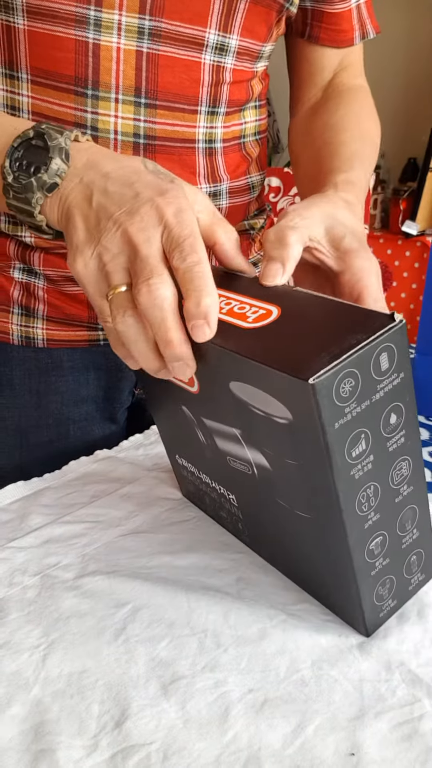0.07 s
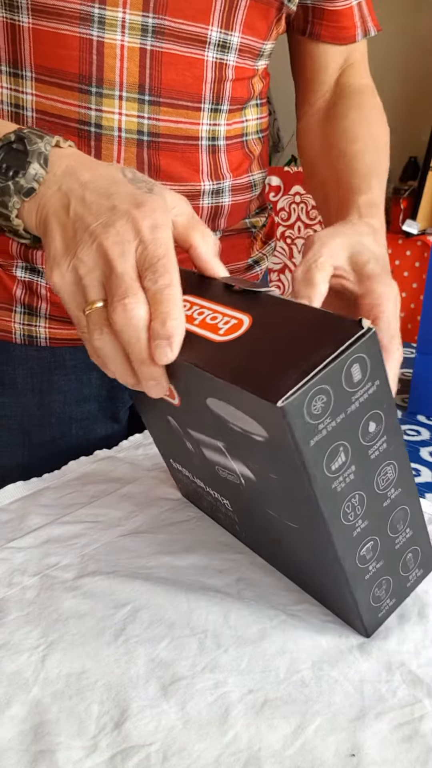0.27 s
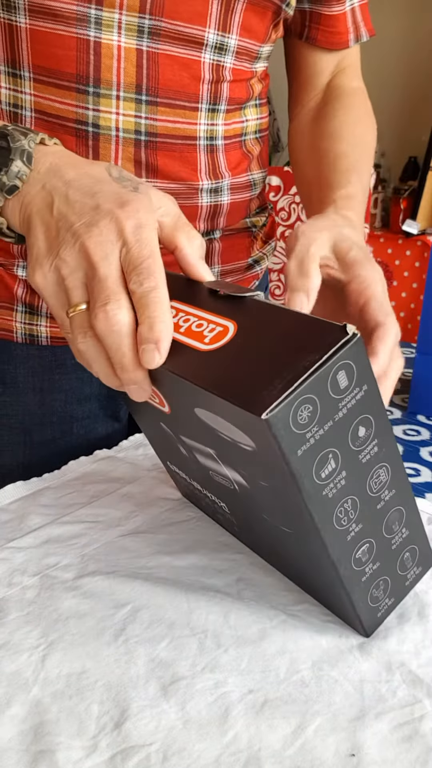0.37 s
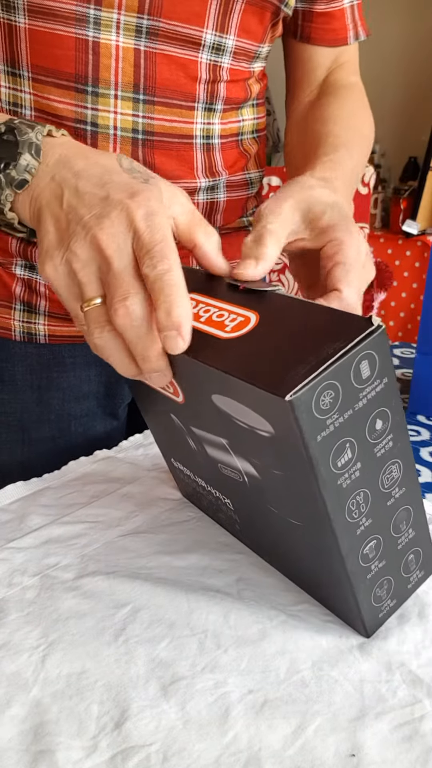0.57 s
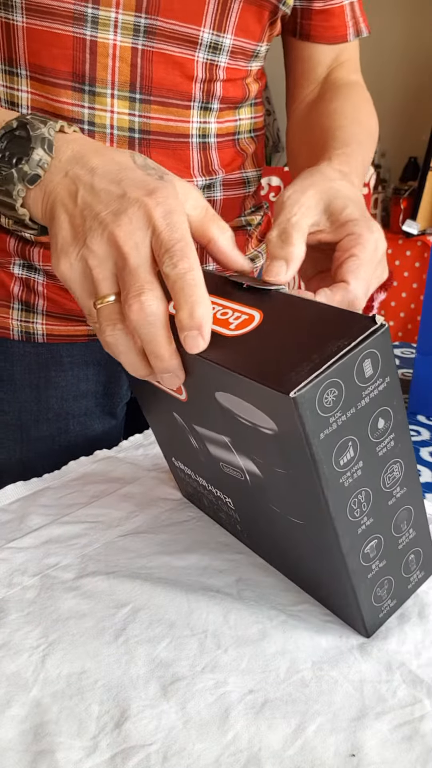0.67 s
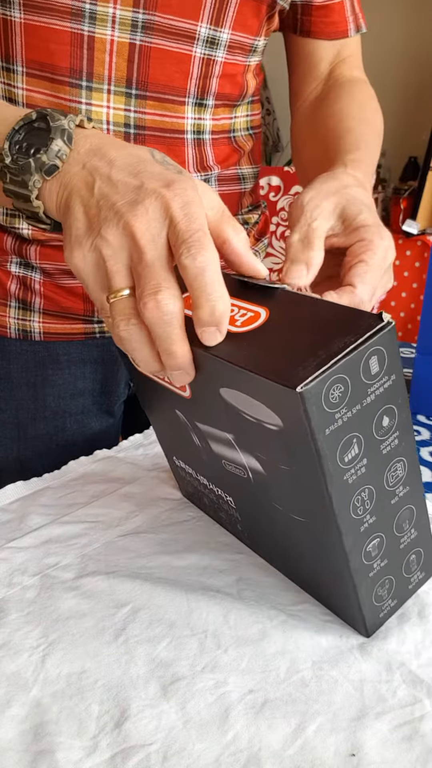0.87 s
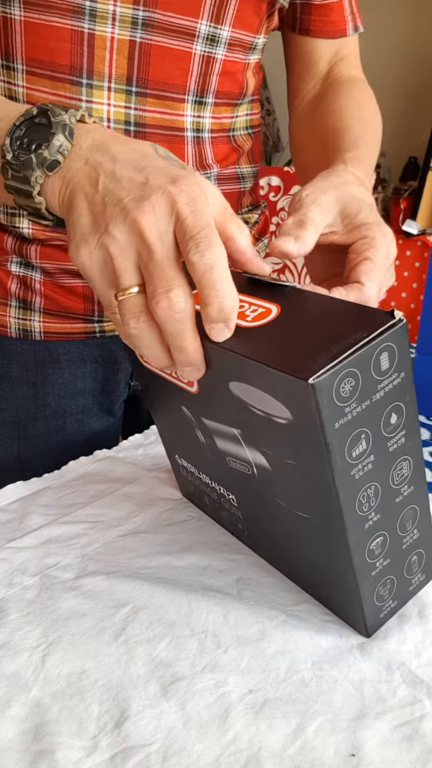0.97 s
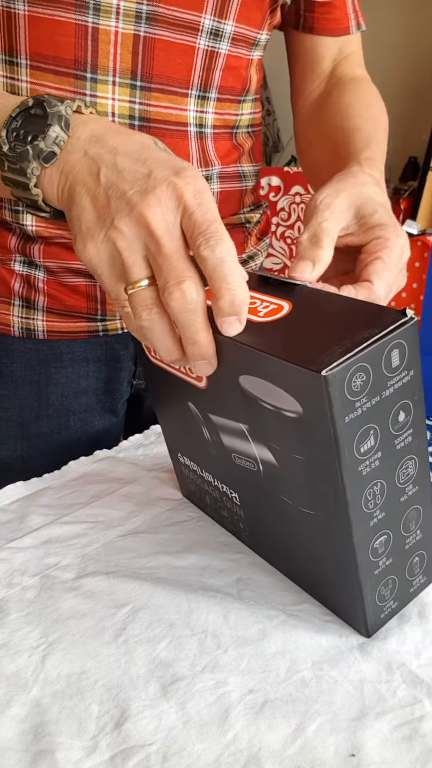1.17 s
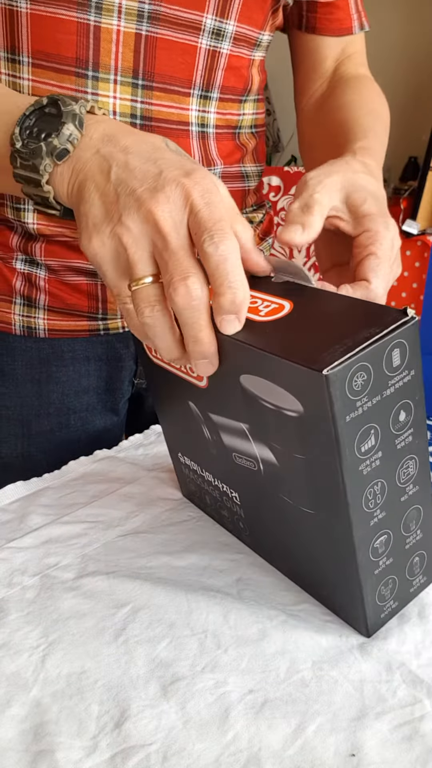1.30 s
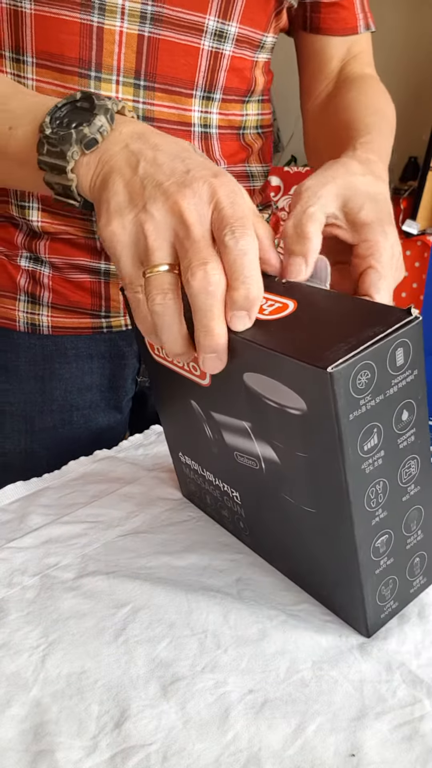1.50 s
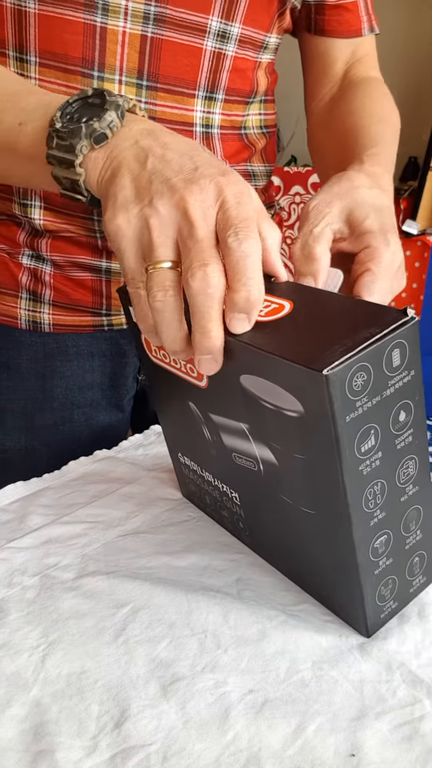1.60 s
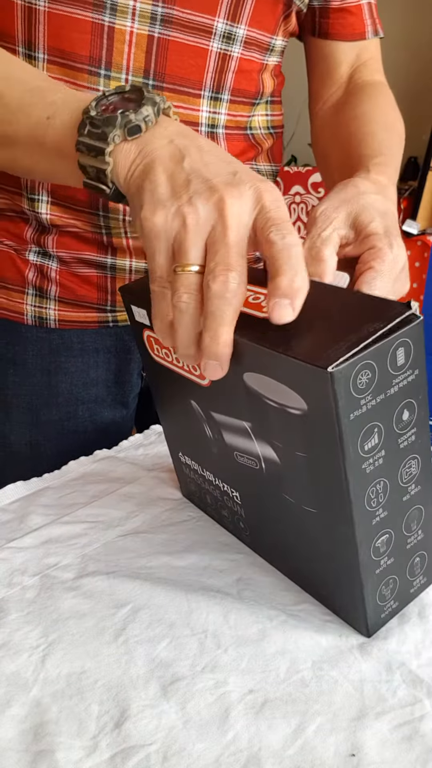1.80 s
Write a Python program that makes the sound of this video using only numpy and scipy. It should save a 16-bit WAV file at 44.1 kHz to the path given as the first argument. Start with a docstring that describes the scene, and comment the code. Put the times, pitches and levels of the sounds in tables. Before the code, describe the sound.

A cardboard box flap scrapes along its slot and snaps free at about 0.3 seconds with a sharp, hollow crack. From 0.6 to 1.5 seconds, fingers softly rub, bump and tick on the card. A second, thinner snap comes near 1.6 seconds, followed by light touches and a faint scrape around 1.85. Everything is close and slightly left, in a small quiet room with a faint low hum.

```python
"""Hands work at the lid flap of a cardboard box on a cloth-covered table in a small quiet room.
After a light touch, the flap scrapes along its slot and snaps free at 0.26 s, exciting the modes of
the stiff panels and of the enclosed air. Fingers then bump, rub and tick on the card until a second
snap at 1.56 s; a few more touches and a faint scrape end the scene. Throughout, near reflections and
a short reverberation follow each contact, over a low hum."""
import sys
import numpy as np
from scipy import signal
from scipy.fft import rfft, irfft, next_fast_len
from scipy.io import wavfile

SR = 44100
rng = np.random.default_rng(int(sys.argv[2]) if len(sys.argv) > 2 else 0)


def pcm_store(signal):
    """Save signal as 16-bit PCM."""
    levels = np.round(np.clip(np.atleast_2d(signal), -1, 1) * 32767)
    wavfile.write(sys.argv[1], SR, levels.astype(np.int16).T)


N = 81585
TIME = np.arange(N) / SR

# Snaps of the flap; levels in the contact and spectrum tables are relative:
# (time [s], panel ring [dB], crack [dB], edge [dB], cavity [dB], thud [dB], splinter t60 [s], pan [dB])
SNAPS = [(0.2628, -3.5, 6.5, -17, 0, 1, 0.018, 6.5), (1.5595, -25.5, -4, -3.5, -11.5, 1, 0.016, 8.5)]
# Spectra of the card's dull thud, treble hiss and highest fizz: (frequency [Hz], level [dB])
THUD = [(30, -28.5), (70, -3.5), (140, 5), (200, 9.5), (330, -0.5), (600, 7), (1500, 5.5), (5000, -9.5),
        (16000, -26.5)]
HISS = [(200, -27.5), (1500, -29.5), (3000, 0.5), (4500, 7.5), (5600, 10), (7000, -17), (16000, -26.5)]
FIZZ = [(1000, -30.5), (6500, -10), (8500, -7.5), (10500, -0.5), (12500, 6.5), (15500, 6)]


def snaps(panels):
    """Sudden release of elastic energy: the fold cracks, the edge ticks, the box thuds and rings."""
    # Spectra of the yielding fold and of the flap's thin edge: (frequency [Hz], level [dB])
    fold_spectrum = [(60, -19.5), (200, -3.5), (550, 4), (850, 5), (1400, 10.5), (2000, 0), (3000, -2.5),
                     (5200, -3), (7400, -16.5), (9000, -26), (12000, -15), (16000, -11)]
    edge_spectrum = [(500, -24.5), (2500, -3.5), (4000, -9.5), (5200, 4.5), (5900, -2.5), (7200, -34.5),
                     (8500, -17), (11000, -28), (14000, -18), (16000, -27)]
    crossing_s = 0.00064  # bending waves take this long to cross a panel
    out = 0
    for s, ring_db, crack_db, edge_db, _, thud_db, t60, pan_db in SNAPS:
        crack = from_db(4.5 + crack_db) * colour(burst(3, t60), fold_spectrum)
        edge = from_db(edge_db) * colour(burst(-3, t60), edge_spectrum)
        ring = from_db(ring_db) * through(click(s + crossing_s), panels)
        thud = from_db(thud_db) * colour(contact(s, cut_hz=700), THUD)
        out = out + place(through(click(s), crack + edge) + ring + thud, pan_db)
    return out


def cavity_ring(cavity):
    """Cavity resonance: the air in the box rings on after each snap."""
    blows = sum(from_db(cavity_db) * click(s) for s, _, _, _, cavity_db, *_ in SNAPS)
    return place(from_db(-0.5) * through(blows, cavity), pan_db=4)


def bumps(box):
    """Soft impact: a finger or the flap lands, scuffs as it settles and weakly excites the box's modes."""
    # Landings: (time [s], level [dB], contact cut-off [Hz])
    landings = [(0.002, -32, 204), (0.094, -35, 168), (0.2165, -12.5, 376), (0.2235, -16.5, 450),
                (0.23, -18, 700), (0.2522, -25, 900), (0.2544, -10, 593), (0.606, -43, 1500),
                (0.6230, -32, 800), (0.636, -46.5, 2510), (0.647, -30, 278), (0.817, -40.5, 750),
                (0.827, -34.5, 350), (1.067, -47, 387), (1.2594, -32.5, 1050), (1.268, -35, 700),
                (1.306, -39.5, 1200), (1.320, -37, 397), (1.5502, -31, 1500), (1.713, -42.5, 397),
                (1.729, -33, 380)]
    force = sum(from_db(db) * through(contact(s, cut_hz), burst(db=2, t60=0.05))
                for s, db, cut_hz in landings)
    thud = from_db(19) * colour(force, THUD)
    ring = from_db(-4) * through(force, box)
    return place(thud + ring, pan_db=8)


def scrapes():
    """Stick-slip friction: card drags on card and drives the resonances of the flap."""
    # Drags along the slot: (peak time [s], rise [s], fall [s], rasp [dB], squeal [dB], fizz [dB])
    drags = [(0.206, 0.028, 0.02, -29.5, -32.5, -32), (0.2165, 0.01, 0.0078, -29, -42, -27),
             (1.848, 0.023, 0.052, -45, -48.5, -48)]
    # Spectrum of card on card: (frequency [Hz], level [dB])
    rasp_spectrum = [(80, -31.5), (400, -9), (800, -5), (1300, 7), (2000, -18), (3000, -11.5), (5300, -3),
                     (7000, -18.5), (10000, -25.5), (16000, -39)]
    # Modes of the flap: (frequency [Hz], level [dB], t60 [s])
    flap_modes = [(1080, -5, 0.018), (1400, 1, 0.02), (1780, 0, 0.02), (2020, -4, 0.016), (2950, 1, 0.008)]
    slips = friction(per_s=7000)
    rasp = colour(slips, rasp_spectrum)
    squeal = through(slips, ringing(flap_modes))
    fizz = colour(friction(per_s=7000), FIZZ)
    return place(strokes(drags, [rasp, squeal, fizz]), pan_db=8)


def rubs():
    """Sliding friction: skin moves over smooth card in uneven slips and now and then catches."""
    # Finger strokes: (peak time [s], rise [s], fall [s], body [dB], hiss [dB], fizz [dB])
    slides = [(0.0, 0.018, 0.03, -60.5, -84, -66), (0.09, 0.16, 0.3, -75, -65.5, -63),
              (0.167, 0.00783, 0.033, -51.5, -50.5, -56), (0.640, 0.045, 0.11, -59, -62.5, -55.5),
              (0.70, 0.05, 0.41, -75.5, -67.5, -65), (0.812, 0.035, 0.02, -48.5, -62.5, -50.5),
              (0.95, 0.022, 0.041, -72, -69.5, -72), (1.11, 0.08, 0.076, -68, -67, -56),
              (1.305, 0.037, 0.03, -49, -59, -46.5), (1.41, 0.2, 0.11, -59.5, -69, -68),
              (1.545, 0.05, 0.041, -58.5, -59, -58), (1.65, 0.034, 0.096, -84, -77, -66),
              (1.725, 0.097, 0.059, -58.5, -61.5, -61.5)]
    # Spectrum of the low body of a rub: (frequency [Hz], level [dB])
    body_spectrum = [(40, -12.5), (120, 0), (400, -1.5), (750, 2.5), (1400, 1), (2300, -9), (5000, -9),
                     (16000, -52.5)]
    textures = [colour(friction(per_s=3500, spread_db=3.5), spectrum)
                for spectrum in (body_spectrum, HISS, FIZZ)]
    return place(strokes(slides, textures) + ticks(), pan_db=6.5)


def ticks():
    """Local yielding: the card gives under a fingertip with a dry tick."""
    # Catches: (time [s], hiss [dB], fizz [dB])
    catches = [(0.607, -39, -46), (0.638, -29.5, -50), (0.811, -44, -43), (1.123, -47, -47),
               (1.259, -33.5, -48), (1.31, -38.5, -26), (1.404, -57, -40.5)]
    out = sum(colour(from_db(hiss_db) * click(s), HISS) + colour(from_db(fizz_db) * click(s), FIZZ)
              for s, hiss_db, fizz_db in catches)
    return through(out, burst(db=5, t60=0.015))


def reflections(x, db, t60, delay_s):
    """Scattering: small near surfaces return a brief cluster of echoes with little bass."""
    # Spectrum of the echoes: (frequency [Hz], level [dB])
    echo_spectrum = [(100, -17), (300, -1.5), (700, 1), (16000, -2.5)]
    echoes = diffuse() * from_db(-60 * TIME / t60) * (TIME >= delay_s)
    return from_db(db) * colour(through(x, echoes / np.linalg.norm(echoes[0])), echo_spectrum)


def room(x, bands=9, delay_s=0.012, build_s=0.003):
    """Reverberation: a diffuse field decays exponentially, each band at its own rate."""
    # Reverberation times: (frequency [Hz], t60 [s])
    decay_times = [(100, 0.18), (260, 0.23), (700, 0.45), (1800, 0.39), (4800, 0.43), (13000, 0.31)]
    # Colouring of the reverberation: (frequency [Hz], level [dB])
    room_spectrum = [(50, 7), (130, -8.5), (400, 3.5), (800, -4), (1400, -2.5), (3000, 1), (6000, -8.5),
                     (10000, 4.5), (16000, -14.5)]
    noise, hz = rfft(diffuse()), np.fft.rfftfreq(N, 1 / SR)
    centres, tail = np.geomspace(60, 15000, bands), 0
    for centre, share in zip(centres, np.eye(bands)):
        band = irfft(noise * at_hz(np.c_[centres, share], hz), N)
        tail = tail + band * from_db(-60 * TIME / at_hz(decay_times, centre))
    tail = tail * np.clip((TIME - delay_s) / build_s, 0, 1)
    return from_db(-4) * colour(through(x, tail / np.linalg.norm(tail[0])), room_spectrum)


def background():
    """Ambient noise: a faint diffuse floor and a low hum under slow random amplitude modulation."""
    # Tones of the hum and spectrum of the floor: (frequency [Hz], level [dB])
    hum_tones = [(49.5, -60.5), (100, -69.5)]
    floor_spectrum = [(20, -22), (34, -7), (50, -11), (70, 12), (120, 3), (250, -5), (800, -12),
                      (2200, -14.5), (4800, -12), (7500, -27), (11000, -18), (16000, -8.5)]
    waver = rms_one(colour(rng.standard_normal(N), [(4, 0), (16, -40), (60, -120)]))
    hum = sum(from_db(db) * np.sqrt(2) * np.sin(2 * np.pi * (hz * TIME + rng.random()))
              for hz, db in hum_tones)
    floor = from_db(-65.5) * rms_one(colour(diffuse(), floor_spectrum))
    return hum * (1 + 0.15 * waver) + floor


def ringing(modes):
    """Modal superposition: an impulse response of damped sines, neighbours opposite in sign."""
    return sum((-1) ** k * from_db(db - 60 * TIME / t60) * np.sin(2 * np.pi * hz * TIME)
               for k, (hz, db, t60) in enumerate(modes))


def click(s):
    """A unit impulse at time s."""
    return 1.0 * (np.arange(N) == int(s * SR))


def contact(s, cut_hz):
    """Contact compliance: softness acts as a low-pass filter on an impulse."""
    return signal.sosfilt(signal.butter(2, cut_hz, fs=SR, output="sos"), click(s) + 1e-18)


def burst(db, t60):
    """Spectral whitening: a click and a dying run of smaller ones, flattened so as to have no pitch."""
    t = TIME[:8192]
    run = rng.standard_normal(len(t)) * from_db(-60 * t / t60)
    out = (t == 0) + from_db(db) * run / np.linalg.norm(run)
    for _ in range(4):
        spectrum = rfft(out)
        out = irfft(spectrum / (abs(spectrum) + 1e-9)) * (t < t60)
    return out


def friction(per_s, spread_db=0):
    """Shot noise: tiny slips at random instants, their sizes scattered by spread_db."""
    sizes = from_db(spread_db * np.minimum(rng.exponential(1, N), 5)) * rng.choice([-1, 1], N)
    return sizes * (rng.random(N) < per_s / SR)


def strokes(rows, textures, roundness=1.3):
    """Amplitude envelopes: each mix of textures gains 20 dB over its rise and loses 20 over its fall."""
    out = 0
    for s, rise, fall, *levels in rows:
        from_peak = np.maximum((s - TIME) / rise, (TIME - s) / fall)
        swell = from_db(-20 * from_peak ** roundness)
        out = out + swell * sum(from_db(db) * rms_one(x) for db, x in zip(levels, textures))
    return out


def place(x, pan_db, right_lag_s=0.00011):
    """Time and level differences: the box is nearer the left microphone, so earlier and louder there."""
    # Left-right level difference: (frequency [Hz], multiple of pan_db [ratio])
    pan_share = [(150, 0.45), (400, 0.1), (1200, 1.2), (5000, 1.816), (9000, 0.46), (14000, 0.41)]
    x = np.ravel(x)
    pair = np.array([x, np.interp(TIME - right_lag_s, TIME, x)])
    size = next_fast_len(N + 2000)
    lean = from_db(pan_db / 2 * at_hz(pan_share, np.fft.rfftfreq(size, 1 / SR)))
    return irfft(rfft(pair, size) * [lean, 1 / lean], size)[:, :N]


def diffuse():
    """Diffuse-field coherence: stereo white noise, alike in the bass and unrelated in the treble."""
    # Left-right likeness: (frequency [Hz], coherence [ratio])
    coherence = [(100, 0.54), (300, 1), (600, 0.45), (1200, 0.05), (16000, 0.02)]
    mid, side = rfft(rng.standard_normal((2, N)))
    alike = at_hz(coherence, np.fft.rfftfreq(N, 1 / SR))
    return rms_one(irfft(np.sqrt(1 + alike) * mid + np.sqrt(1 - alike) * side * [[1], [-1]], N))


def colour(x, spectrum, size=8192):
    """Minimum-phase filtering: folding the cepstrum gives a causal filter with the given spectrum."""
    gain = from_db(at_hz(spectrum, np.fft.rfftfreq(size, 1 / SR)))
    cepstrum = irfft(np.log(gain))
    cepstrum[1:size // 2] *= 2
    cepstrum[size // 2 + 1:] = 0
    return through(x, irfft(np.exp(rfft(cepstrum))))


def through(x, response):
    """Convolution with an impulse response."""
    return signal.fftconvolve(np.atleast_2d(x), np.atleast_2d(response), axes=-1)[:, :N]


def at_hz(points, hz):
    """Interpolation on a log-frequency axis."""
    frequencies, values = np.transpose(points)
    return np.interp(np.log(np.maximum(hz, 1)), np.log(frequencies), values)


def from_db(db):
    """Decibels to amplitude ratio."""
    return 10 ** (np.asarray(db) / 20)


def rms_one(x):
    """Normalisation to an rms of 1."""
    return x / np.sqrt(np.mean(x ** 2) + 1e-20)


def scene():
    """Superposition of direct sound, near echoes, reverberation and background."""
    # Modes of the damped panels and of the enclosed air: (frequency [Hz], level [dB], t60 [s])
    panel_modes = [(135, -35.5, 0.19), (285, -32.5, 0.04), (733, -20.5, 0.05), (934, -18, 0.076),
                   (1360, -11.5, 0.039), (1472, -13.5, 0.028), (1980, -35, 0.045), (3250, -27.5, 0.012)]
    cavity_modes = [(167, -36, 0.22), (195, -41, 0.25), (288, -36, 0.22), (565, -36, 0.25), (699, -31, 0.2),
                    (822, -36, 0.28), (920, -32, 0.24), (1151, -33, 0.22), (1318, -30, 0.24),
                    (1391, -35, 0.17), (1517, -37, 0.18), (1749, -37, 0.22), (1958, -39, 0.22),
                    (2183, -35, 0.22)]
    panels, cavity = ringing(panel_modes), ringing(cavity_modes)
    card = snaps(panels) + bumps(panels + cavity) + scrapes()
    skin = rubs()
    radiated = (card[0] + from_db(-1) * skin[0]) / np.sqrt(2)
    scatter = reflections(radiated, db=-5, t60=0.021, delay_s=0)  # box and table top
    early = reflections(radiated, db=-5.5, t60=0.057, delay_s=0.004)  # table, body and near walls
    return card + skin + cavity_ring(cavity) + scatter + early + room(radiated) + background()


def record(dry):
    """Band limiting: a steep elliptic low-pass at 15850 Hz."""
    return signal.sosfilt(signal.ellip(14, .1, 80, 15850, fs=SR, output="sos"), dry)


dry = scene()
out = record(dry)
pcm_store(out)
```